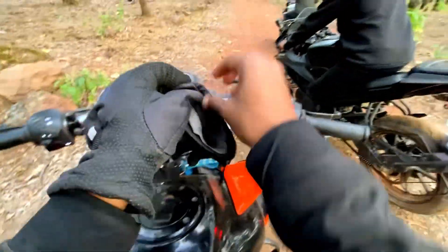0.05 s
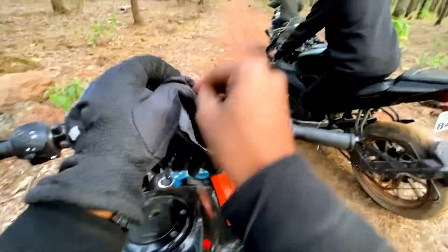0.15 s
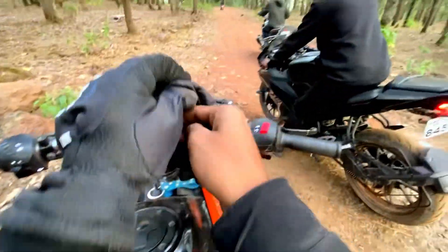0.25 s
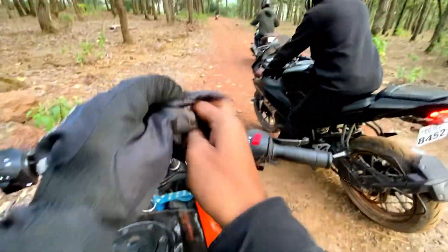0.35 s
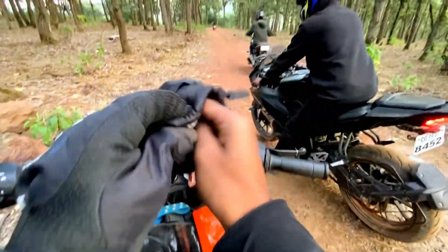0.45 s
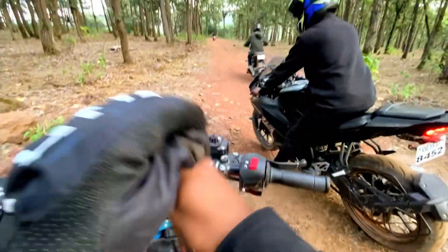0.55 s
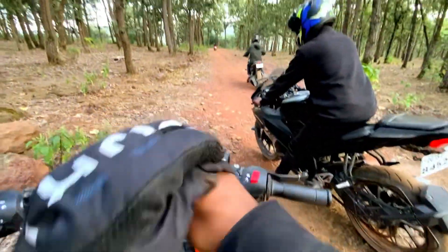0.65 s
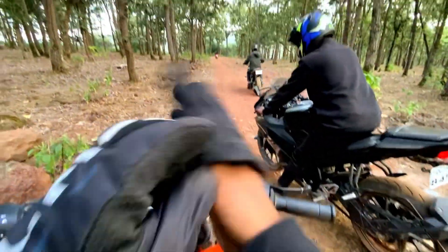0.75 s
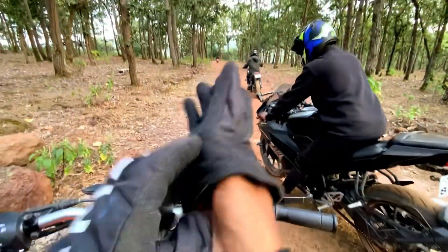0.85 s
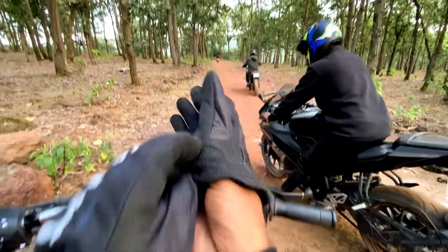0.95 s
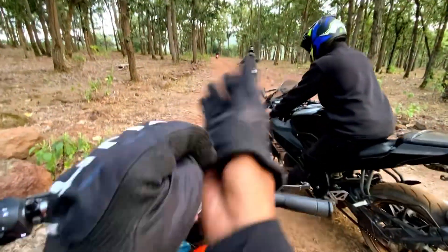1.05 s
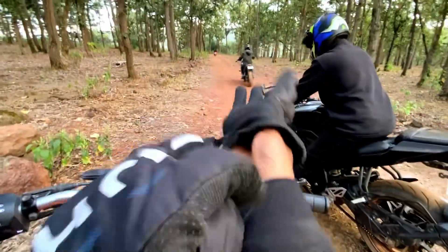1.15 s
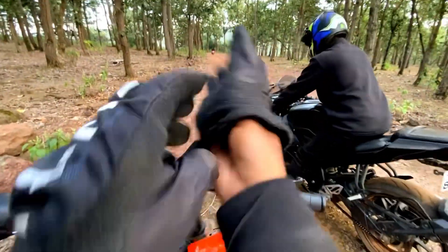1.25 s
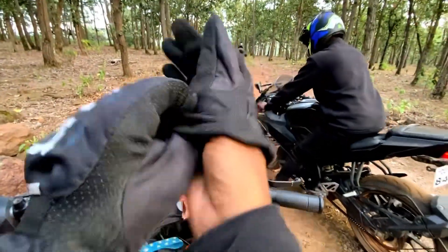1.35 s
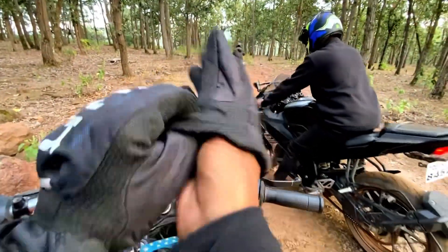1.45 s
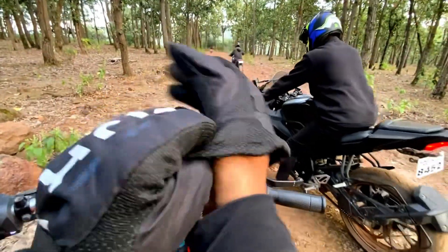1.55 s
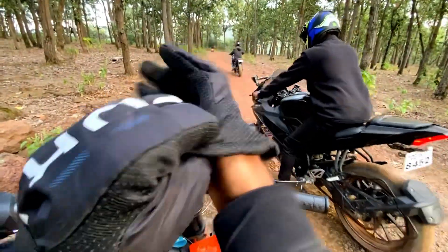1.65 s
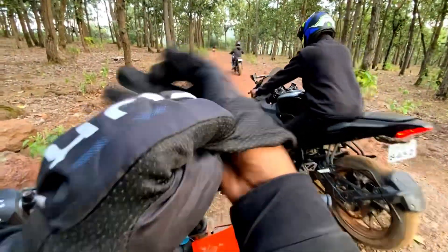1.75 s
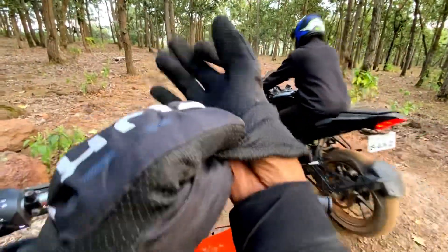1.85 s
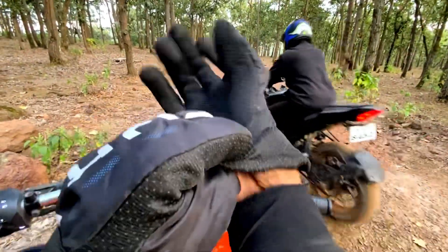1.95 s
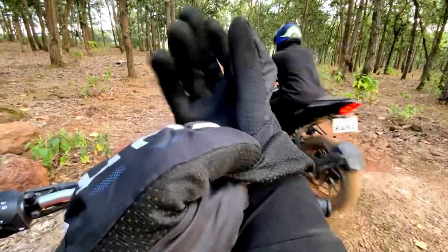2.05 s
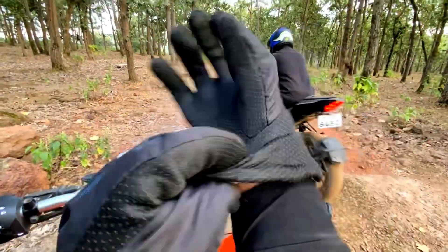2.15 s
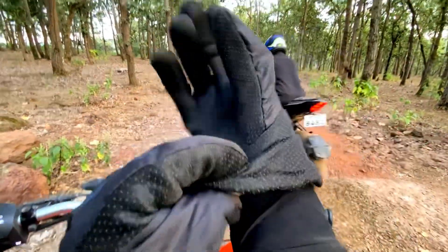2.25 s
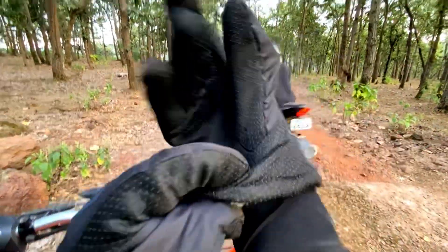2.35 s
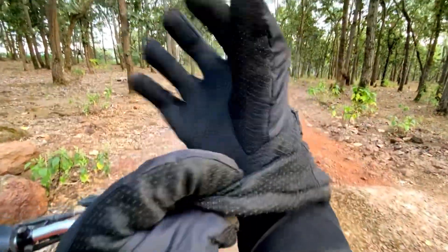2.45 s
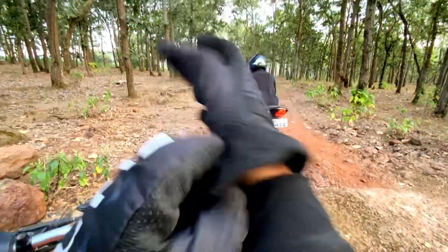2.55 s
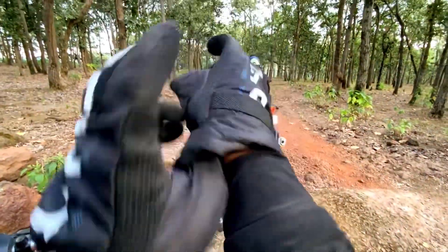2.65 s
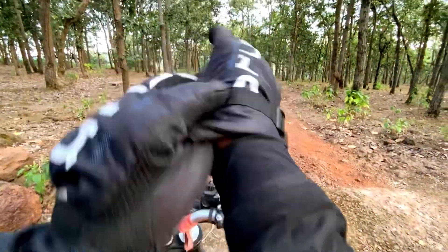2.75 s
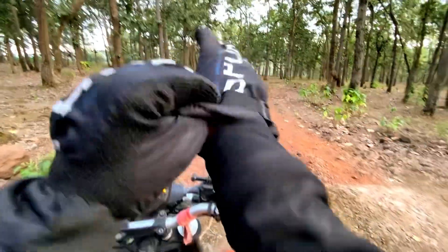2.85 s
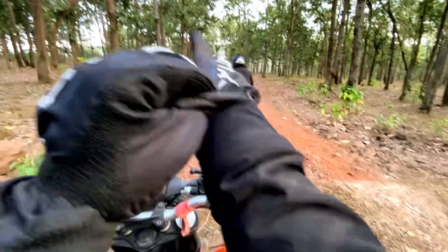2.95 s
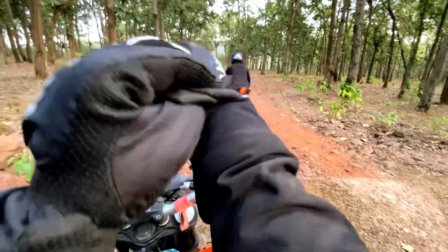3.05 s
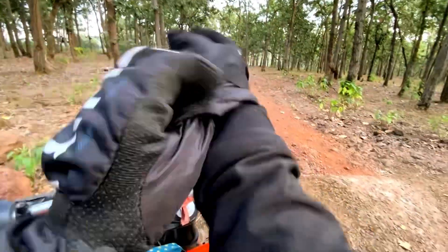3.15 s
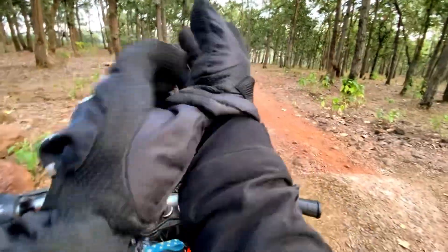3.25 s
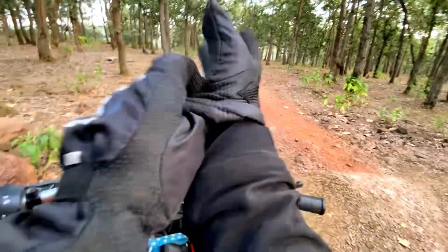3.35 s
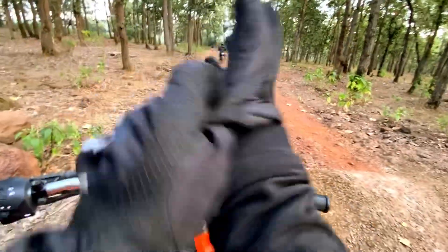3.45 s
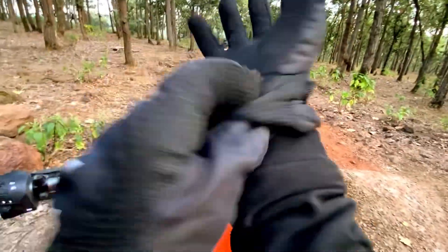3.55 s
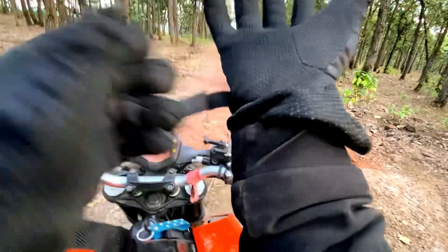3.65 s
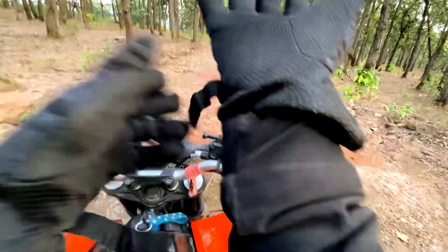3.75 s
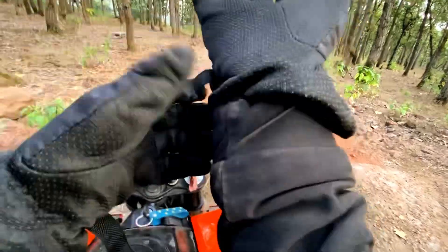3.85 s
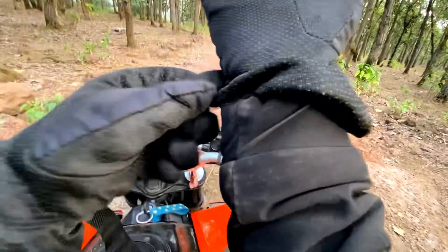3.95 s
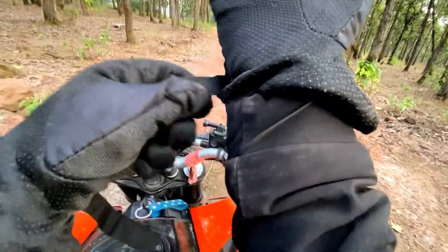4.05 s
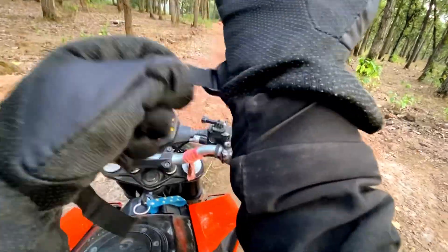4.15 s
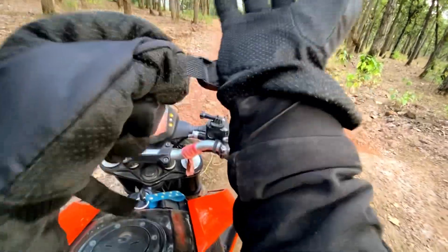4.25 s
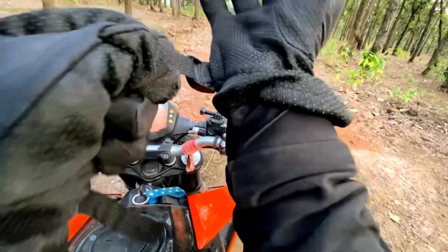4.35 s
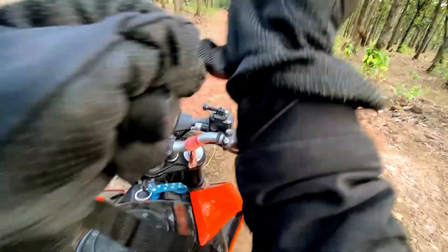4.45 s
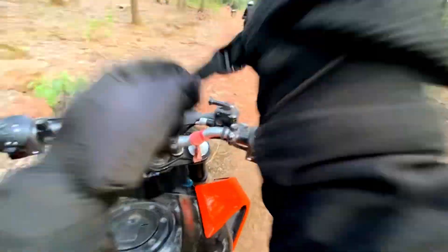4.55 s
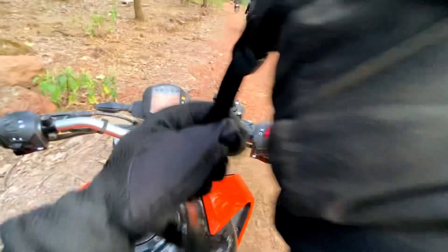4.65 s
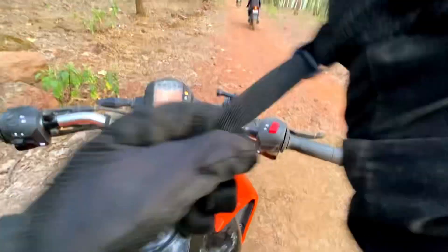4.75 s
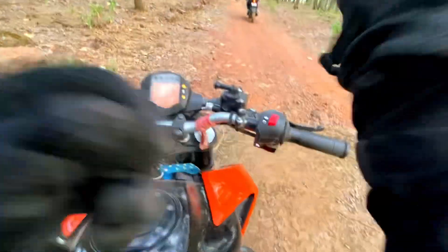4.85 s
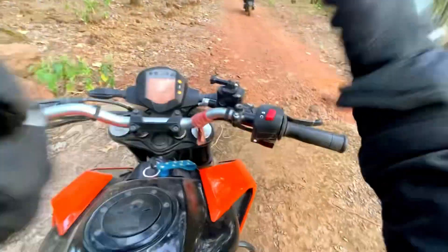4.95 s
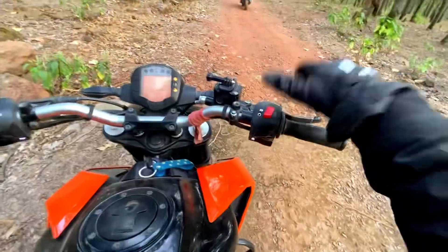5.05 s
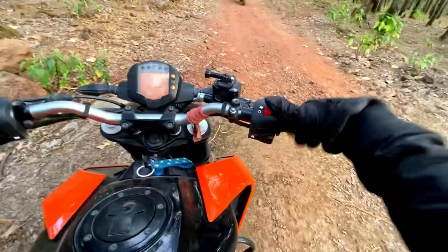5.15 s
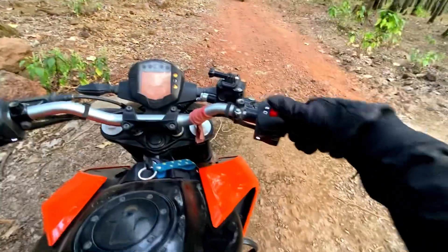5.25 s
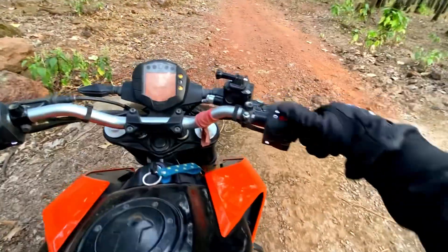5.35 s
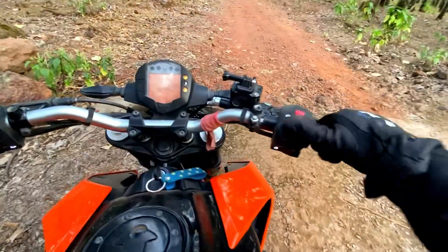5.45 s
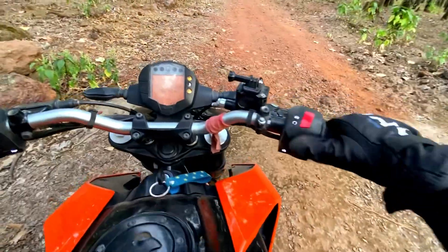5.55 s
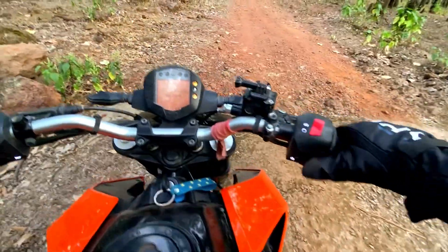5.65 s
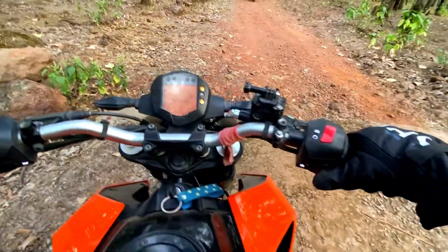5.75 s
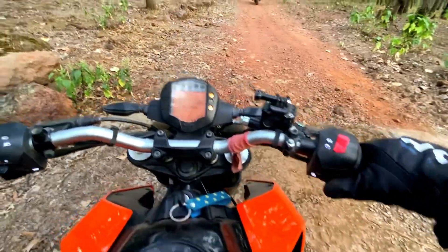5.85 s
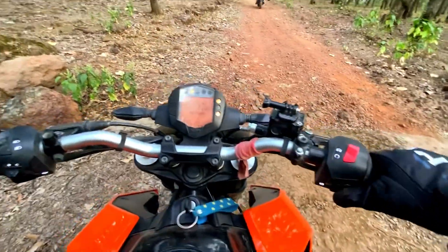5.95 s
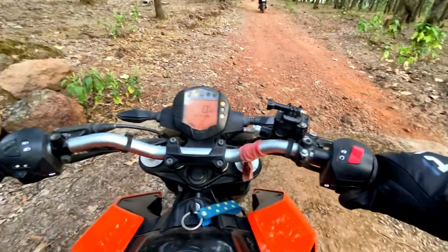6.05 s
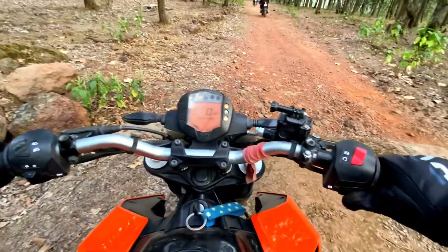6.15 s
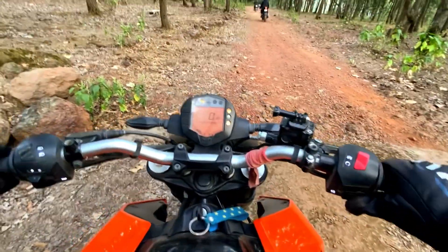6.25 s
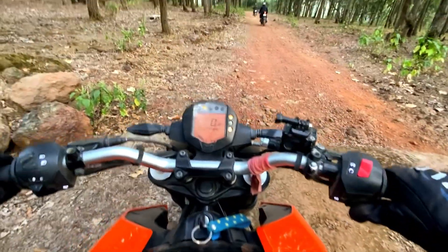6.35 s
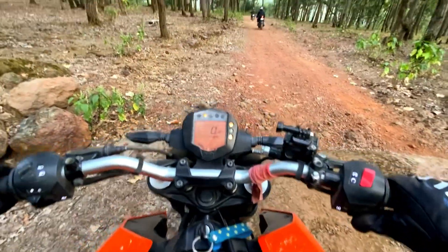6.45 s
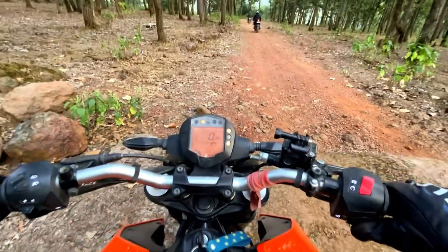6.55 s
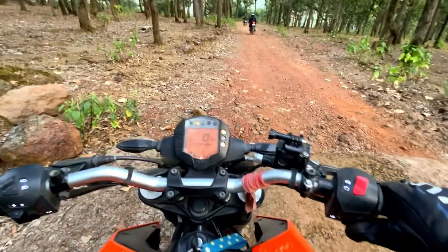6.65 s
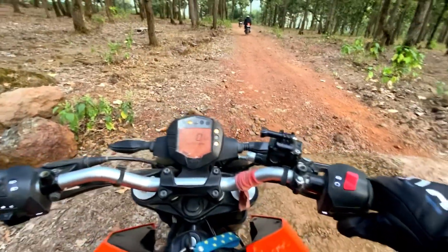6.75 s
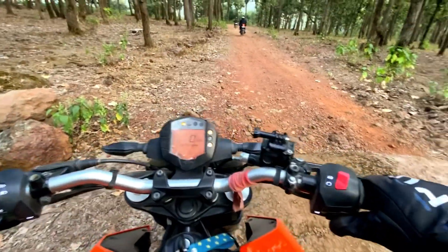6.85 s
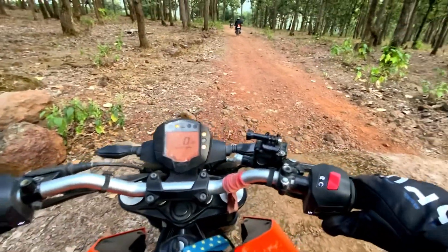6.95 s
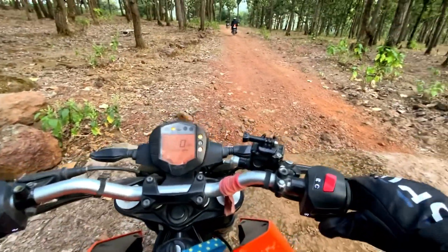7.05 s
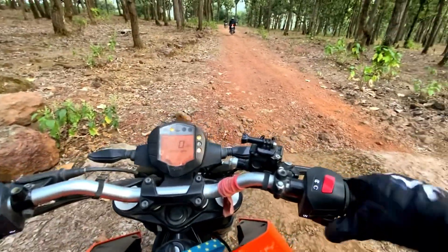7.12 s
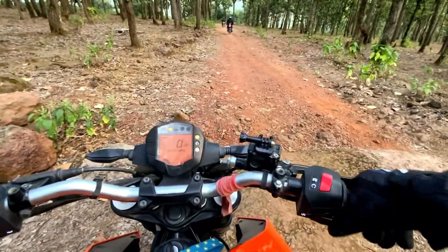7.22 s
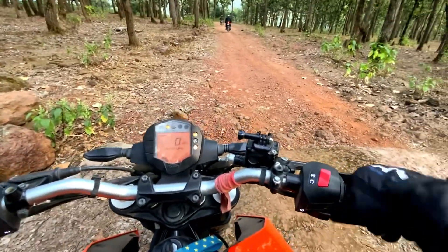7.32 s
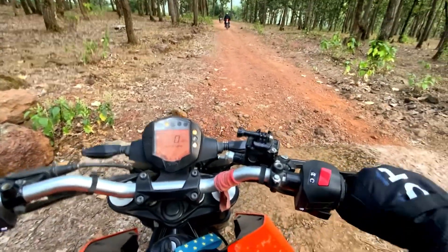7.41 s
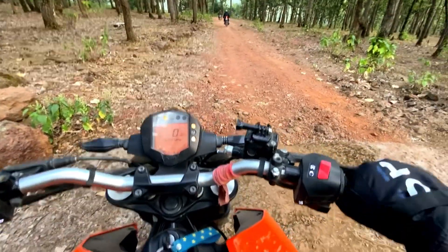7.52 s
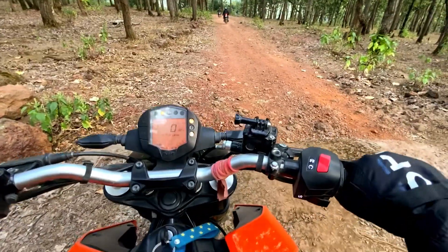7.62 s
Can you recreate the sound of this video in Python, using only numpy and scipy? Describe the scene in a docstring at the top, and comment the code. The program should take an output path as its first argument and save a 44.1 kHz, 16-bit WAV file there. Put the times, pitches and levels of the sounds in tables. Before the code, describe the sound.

Outdoors on a forest track, heard from a rider's helmet. A distant motorcycle pops away quickly while one alongside idles in slow thumps, blips up with a raspy roar, then recedes. Gloves snap and pat close by, wind rumbles in soft gusts, a switch clicks. Finally a starter clunks, whines and grinds, and the rider's engine catches and revs.

```python
"""A forest track, heard at a rider's helmet microphone among three single-cylinder motorcycles.
Far ahead one speeds off as sharp pops along its pipe; the one alongside revs up and rides away, its firings
puffing through pipe and silencer under noises gated by the cycle. Close by, gloves snap and a switch clicks
as ringing modes and noise. Then the rider's starter whines and grinds as it cranks, and the engine catches.
A light breeze, low noise swelling in gusts, rumbles on the microphone over a faint forest hiss."""
import sys
import numpy as np
from scipy import signal
from scipy.fft import rfft, irfft, next_fast_len
from scipy.io import wavfile
from scipy.ndimage import uniform_filter1d, map_coordinates

SR = 44100
rng = np.random.default_rng(int(sys.argv[2]) if len(sys.argv) > 2 else 0)


def dump(signal):
    """Clip the signal to [-1, 1] and save it as 16-bit WAV at the path in sys.argv[1]."""
    limited = np.clip(np.atleast_2d(signal).T, -1, 1)
    pcm = np.round(limited * 32767).astype(np.int16)
    wavfile.write(sys.argv[1], SR, pcm)


N = 338688
TIME = np.arange(N) / SR


def amp(db):
    """Decibels to gain."""
    return 10 ** (np.asarray(db) / 20)


def unit(x):
    """Scaled to rms 1."""
    return x / np.sqrt(np.mean(x ** 2) + 1e-20)


def curves(rows):
    """One value per sample for each column after the time."""
    s, *columns = np.transpose(rows)
    return [np.interp(TIME, s, column) for column in columns]


def ramp(s, length):
    """0 before s, 1 from length seconds later."""
    return np.clip((TIME - s) / length, 0, 1)


def bell(x):
    """A bell of height 1 and standard deviation 1 around zero."""
    return np.exp(-.5 * x ** 2)


def bump(s, width):
    """A bell in time, of height 1 around s."""
    return bell((TIME - s) / width)


def wobble(rate):
    """A smooth random curve, rate knots a second."""
    knots = rng.standard_normal(int(N * rate / SR) + 4)
    return map_coordinates(knots, [TIME * rate])


def filtered(x, response):
    """x times a complex response of frequency."""
    m = next_fast_len(N + SR // 2)
    return irfft(rfft(x, m) * response(np.fft.rfftfreq(m, 1 / SR)), m)[..., :N]


def noise(spectrum, flutter_db=1.5):
    """Coloured noise of rms 1 whose level flutters; only the shape of the spectrum counts."""
    f, db = np.transpose(spectrum)

    def colour(hz):
        return amp(np.interp(np.log(hz + 1), np.log(f + 1), db, -120, -120))

    return unit(filtered(rng.standard_normal(N) * amp(flutter_db * wobble(45)), colour))


def add(track, s, sound):
    """Mixes a sound in at s seconds."""
    part = track[round(s * SR):][:len(sound)]
    part += sound[:len(part)]


def strike(modes, t):
    """One blow on decaying modes, each a little stronger or weaker than usual."""
    ring = 0
    for hz, db, t60 in modes:
        ring = ring + amp(db + rng.normal(0, 1.7) - 60 * t / t60) * np.sin(2 * np.pi * hz * t)
    return ring * (1 - np.exp(-t / 0.00041))


def crank(speed, scatter_db):
    """One impulse per firing, sized for steady power at any speed, and the cycle count."""
    rate = curves(speed)[0]
    cycles = np.cumsum(rate * (TIME >= speed[0][0])) / SR
    fires = np.diff(np.where(cycles > 0, np.floor(cycles), -1), prepend=-1) > 0
    return fires * amp(scatter_db * wobble(40)) / np.sqrt(rate), cycles


def gate(cycles, depth, at):
    """Swells once a cycle around phase at; mean power 1."""
    return unit(np.exp(depth * np.cos(2 * np.pi * (cycles - at))))


def burst(cycles, at, fall_db):
    """Jumps up once a cycle at phase at and dies away by fall_db until the next; mean power 1."""
    return unit(uniform_filter1d(amp(-fall_db * ((cycles - at) % 1)), size=60))


def orders(cycles, table, waver_db=3.5, blur=0):
    """Tones locked to the crankshaft (gear teeth, cam lobes), a little unsteady."""
    total = 0
    for k, db in table:
        level = amp(db + waver_db * wobble(7.2)) * np.sqrt(2)
        phase = 2 * np.pi * k * cycles + 0.16 * wobble(9.8) + blur * wobble(30)
        total = total + level * np.sin(phase)
    return total


def pop(fires):
    """A short suck, then a sharp puff centred on each firing; peak about 1."""
    u = (TIME[:SR // 50] - .01) / .0007  # time in puff widths of 0.7 ms
    shape = bell(u) - .8 * bell((u + 2.8) / 1.4) - .3 * bell((u - 3) / 1.5)
    return signal.fftconvolve(fires, shape)[SR // 100:][:N]


# A small puff as the valve cracks open: (time before the suck [s], share of a full puff)
FORERUNNER_PUFF = (.0058, .2)


def exhaust(fires, echo, width, puff, pipe, box_hz, box_db, box_t60):
    """Each firing is a suck and a puff; the pipe returns them, then the silencer box breathes out slowly."""
    t = np.arange(SR // 8) / SR - .01

    def lobe(at, wide):
        return bell((t - at) / wide)

    late = np.maximum(t - pipe - width, 0)
    breath = amp(box_db - 60 * late / box_t60) * np.sin(2 * np.pi * box_hz * late)
    first = puff * lobe(2 * width, 0.64 * width) - 1.154 * lobe(0, 0.66 * width)
    first += breath - .65 * lobe(pipe, 0.71 * width)
    lead_s, share = FORERUNNER_PUFF
    first += share * lobe(-lead_s, .55 * width)
    back = lobe(pipe + 2 * width, width) - 0.32 * lobe(2 * pipe, 2.0 * width)
    back += 0.043 * lobe(2.5 * pipe, width)
    both = signal.fftconvolve(fires, first) + signal.fftconvolve(fires * echo, back)
    return 9.97 * both[SR // 100:][:N]


def resonances(x, modes, dull_hz):
    """x rings through modes of alternating sign; little above dull_hz leaves the pipe."""
    def response(f):
        ring = 0
        for k, (centre, width, db) in enumerate(modes):
            ring = ring + (-1) ** k * amp(db) * 1j * f * width / (centre ** 2 - f * f + 1j * f * width)
        return ring / (1 + 1j * f / dull_hz) ** 3

    return filtered(x, response)


# Header pipe of the two nearer bikes: (frequency [Hz], width [Hz], level [dB])
HEADER_MODES = [(284, 47, -0.5), (403, 57, -1)]
# Turbulent gas in the header: (frequency [Hz], relative density [dB])
RASP_SPECTRUM = [(60, -43.5), (180, -2), (270, -2.5), (400, -7.5), (520, -15), (900, -35.5)]


def rasp(fires, cycles, lead, rough):
    """The valve's opening rings the header pipe a moment before the puff; turbulent gas blurs the ring."""
    ring = unit(resonances(np.roll(fires, -round(lead * SR)), HEADER_MODES, dull_hz=870))
    gas = gate(cycles, depth=0.13, at=0.77) * noise(RASP_SPECTRUM)
    return np.sqrt(1 - rough) * ring + np.sqrt(rough) * gas


# Wind on the microphone: (frequency [Hz], relative density [dB])
BUFFET_SPECTRUM = [(5, -5), (12, -2.5), (25, -10), (50, -14), (120, -20.5), (220, -29), (350, -37),
                   (600, -80.5)]
# Hiss of the forest: (frequency [Hz], relative density [dB])
FOREST_SPECTRUM = [(300, -19.5), (500, -17.5), (750, -8.5), (1000, -23.5), (1500, -25), (2500, -24.5),
                   (3500, -31.5), (5000, -33.5), (8000, -37.5), (12000, -40), (15800, -45.5)]
# Gusts: (time [s], half length [s], gain [dB])
WIND_GUSTS = [(3.497, 0.15, 5.5), (4.627, 0.14, 6), (6.7, 0.11, 3.5)]


def air():
    """Lumpy wind on the microphone, easing off between gusts, over the faint hiss of the forest."""
    wind_db = -34.5 - 1.1 * TIME + 0.86 * wobble(4.2)  # eases by 1.1 dB a second
    wind_db += sum(db * bump(s, half) for s, half, db in WIND_GUSTS)
    return amp(wind_db) * noise(BUFFET_SPECTRUM) + amp(-70) * noise(FOREST_SPECTRUM, flutter_db=0.1)


# Engine of the bike far ahead: (time [s], firing rate [1/s])
LEADER_RATE = [(.024, 20.2), (.197, 21.4), (.417, 23.9), (.55, 24.4), (.71, 24.8), (.797, 26.3),
               (.927, 29.3), (1.05, 31), (1.6, 33)]
# Round trip of its pipe, shorter as the gas heats: (time [s], round trip [s])
LEADER_PIPE_TRIP = [(0.05, .0101), (.35, .0095), (.9, .0091)]
# Its tones: (multiple of the firing rate, relative level [dB])
LEADER_TONES = [(2, 0), (9, -3), (13, -17), (17, -21)]
# Fading as it draws away: (start time [s], added loss [dB/s])
LEADER_LOSS = [(.5, 9.2), (1.2, 55)]


def leader():
    """The bike far ahead: sharp pops that bounce along its pipe, over faint tones that swell and stop."""
    fires, cycles = crank(LEADER_RATE, scatter_db=.7)
    at = np.flatnonzero(fires)
    trip = curves(LEADER_PIPE_TRIP)[0][at] * SR
    halfway = .2 * np.clip(at / SR + .4, 0, 1)  # the halfway echo grows over the first 0.6 s
    bounces = np.zeros(N + SR)
    for half in range(9):
        share = .58 ** (half // 2) * (halfway if half % 2 else 1)
        arrival = at + np.round(half * trip / 2 + .003 * SR).astype(int)
        bounces[arrival] += share * fires[at]
    singing = .3 + .7 * ramp(.2, .25) - ramp(.82, .13)
    level_db = -36.5 - sum(loss_db * np.maximum(TIME - s, 0) for s, loss_db in LEADER_LOSS)
    return amp(level_db) * (unit(pop(bounces)) + singing * orders(cycles, LEADER_TONES))


# Engine of the bike alongside: (time [s], firing rate [1/s])
NEIGHBOUR_RATE = [(0.0624, 12.71), (0.45, 10.45), (0.63, 11.64), (1.33, 22.82), (1.69, 22.56),
                  (2.07, 16.27), (2.45, 17.14), (2.63, 18.97), (3.14, 20.26), (3.45, 19.91), (4.55, 22.85),
                  (4.8, 13.47), (5.03, 15.05), (5.24, 13.78), (5.8, 12.93), (6.05, 13.97), (6.38, 18.1),
                  (6.9, 15.7)]
# Louder on the throttle, falling with distance, faint as the throttle shuts: (time [s], exhaust drive [dB])
NEIGHBOUR_DRIVE = [(0.06, -32.5), (0.4, -32.5), (1.15, -24.5), (1.65, -24.5), (2.0, -28), (2.56, -28),
                   (3.0, -30), (4.46, -36), (4.69, -47.5), (4.95, -48), (5.3, -43), (6.38, -46),
                   (7.68, -53)]
# Its tones: (multiple of the firing rate, level against the rasp [dB])
NEIGHBOUR_TONES = [(2, 10), (10, -8), (15, -15), (17, -15), (18, -12), (46, -21)]
# Gear whine rising with the hiss: (multiple of the firing rate, level against the hiss [dB])
GEAR_TONES = [(48, -5)]
# Engine clatter, also the rider's own intake roar: (frequency [Hz], relative density [dB])
CLATTER_SPECTRUM = [(400, -36), (560, -12.5), (660, -6.5), (800, -2), (950, -5.5), (1200, -18), (2000, -38)]
# Engine ticking: (frequency [Hz], relative density [dB])
TICKING_SPECTRUM = [(900, -34), (1300, -5.5), (1560, -5), (1780, -4), (2300, -9.5), (2750, -14.5),
                    (3700, -21.5), (4850, -29.5), (5600, -31.5), (7000, -39), (11000, -55.5)]
# Engine hiss near 1 kHz: (frequency [Hz], relative density [dB])
HISS_SPECTRUM = [(700, -35), (950, -3.5), (1100, -2), (1250, -3), (1500, -17.5), (1750, -13.5), (1950, -16),
                 (2300, -25), (3000, -34)]
# The hiss is lifted by the ground reflection, then sinks:
# (rise time [s], rise length [s], sink time [s], sink length [s], hiss gain [dB])
HISS_LIFT = (1.9, 0.87, 4.27, 1.3, 7.24)
BLIP_S = 1.476  # the throttle is blipped


def riding_off(standing_db, blip_db, loss_db):
    """Gain of a noise that swells with the blip and fades, loss_db a second, as the bike leaves."""
    return amp(standing_db + blip_db * bump(BLIP_S, 0.38) - loss_db * np.maximum(TIME - 2.15, 0))


def neighbour():
    """The bike alongside: exhaust beats, rasp, clatter, hiss and ticks, all timed by its strokes."""
    # the share of the pipe echo grows with each firing a second above 19
    echo = np.clip(.36 + .2 * np.maximum(curves(NEIGHBOUR_RATE)[0] - 19, 0), 0, 1)
    fires, cycles = crank(NEIGHBOUR_RATE, scatter_db=.5)
    strokes = fires * amp(curves(NEIGHBOUR_DRIVE)[0])
    beats = exhaust(strokes, echo, width=0.0019, puff=1.165, pipe=0.00823,
                    box_hz=34.3, box_db=-9.5, box_t60=0.21)
    revving = bump(BLIP_S, 0.24)  # the gears sing at the top of the blip
    header = rasp(fires, cycles, lead=.009, rough=.85 - .3 * revving)
    header += revving * orders(cycles, NEIGHBOUR_TONES)
    clatter = gate(cycles, depth=0.17, at=.9) * noise(CLATTER_SPECTRUM)
    rise_s, rise_length, sink_s, sink_length, lift_db = HISS_LIFT
    lifted = ramp(rise_s, rise_length)
    hiss = gate(cycles, depth=0.075, at=0.93) * noise(HISS_SPECTRUM)
    hiss += lifted * orders(cycles, GEAR_TONES, blur=2.5)
    hiss *= amp(lift_db * (lifted - 2 * ramp(sink_s, sink_length)))  # ends as far below as it rose
    ticks = burst(cycles, at=.77, fall_db=8) * noise(TICKING_SPECTRUM, flutter_db=1.2)
    ticks *= amp(2.2 * wobble(300))
    out = beats + riding_off(standing_db=-49, blip_db=5.5, loss_db=3.1) * header
    out += riding_off(standing_db=-59, blip_db=5, loss_db=1.5) * clatter
    out += riding_off(standing_db=-65.5, blip_db=7.4, loss_db=1.5) * hiss
    out += riding_off(standing_db=-64.5, blip_db=9.3, loss_db=5) * ticks
    return out


# Glove snaps and pats: (time [s], level [dB], knock [Hz], pat over snap [dB], crispness [dB])
GLOVE_TOUCHES = [(0.497, -43, 1060, -8, -15), (1.476, -41.5, 1110, -6, -11), (1.734, -31.5, 795, 9, -28),
                 (2.39, -40, 950, 11, -8), (2.783, -41.5, 1040, -25, -8.5), (3.777, -25, 1200, 4, -20),
                 (3.852, -43, 1400, -5, -21), (4.482, -43.5, 900, 12, -23), (4.61, -49, 700, 19, -8),
                 (4.855, -43.5, 1020, -5, -30), (5.119, -48.5, 1360, -16, -11), (5.283, -55, 900, -12, -30)]
# Handlebar switch: (time [s], level [dB], crispness [dB])
SWITCH_CLICKS = [(5.172, -54.5, -2), (5.424, -42.5, -1)]
# Its resonances: (frequency [Hz], level [dB], t60 [s])
SWITCH_RING = [(860, -3, .03), (1800, 0, .016), (2250, -1, .016), (2900, -3, .012), (3900, -8, .01),
               (4500, -10, .01)]
# Small metal ticks from the bike pulling away: (time [s], level [dB])
METAL_TICKS = [(1.859, -56), (1.891, -51), (1.905, -55), (1.946, -63.5)]
# Their resonances: (frequency [Hz], level [dB], t60 [s])
METAL_RING = [(1920, 7, 0.021), (2600, 1, .01), (4000, -2.5, 0.008), (5440, -2, 0.01), (7600, -12, .005)]
# Glove cloth rubbing: (time [s], half length [s], level [dB])
CLOTH_RUSTLES = [(1.89, .03, -69.5), (3.463, .03, -74.5), (4.61, 0.027, -73), (4.79, 0.067, -76)]
# A brake or lever squeaks: (time [s], length [s], frequency [Hz], level [dB])
LEVER_SQUEAK = (1.892, .04, 2420, -50)
# Glove cloth, also part of the starter's grind: (frequency [Hz], relative density [dB])
CLOTH_SPECTRUM = [(500, -15.5), (800, 12.5), (1200, 1.5), (1800, -12.5), (2600, -28.5), (4000, -55)]
# Palm pat, also the starter's crankcase drone: (frequency [Hz], relative density [dB])
PALM_SPECTRUM = [(120, -25.5), (300, 10.5), (550, -9), (900, -26), (1500, -49.5)]
# Crisp edge of cloth and switch: (frequency [Hz], relative density [dB])
CRISP_SPECTRUM = [(1500, -14.5), (2500, 4), (5000, -14.5), (8000, -19), (11000, -42)]


def handling():
    """Gloves snap and pat, a switch clicks, metal ticks and something squeaks."""
    out, t = np.zeros(N), TIME[:SR // 10]
    cloth, palm, crisp = noise(CLOTH_SPECTRUM), noise(PALM_SPECTRUM), noise(CRISP_SPECTRUM)

    def soft(rise, t60):
        return amp(-60 * t / t60) * np.sin(np.pi / 2 * np.clip(t / rise, 0, 1)) ** 2

    def tone(hz):
        return np.sin(2 * np.pi * hz * t)

    for s, db, knock_hz, pat_db, crisp_db in GLOVE_TOUCHES:
        i = round(s * SR)
        snap = cloth[i:][:len(t)] + amp(crisp_db) * crisp[i:][:len(t)]
        knock = tone(knock_hz) + .5 * tone(.75 * knock_hz) + .12 * tone(1.85 * knock_hz)
        knock = soft(.001, .013) * (knock - amp(pat_db) * tone(320))  # with the palm's thud
        tail = soft(.001, .05) * snap + amp(pat_db) * soft(.002, .05) * palm[i:][:len(t)]
        add(out, s - .0005, amp(db) * (knock + amp(-12) * tail))
    for s, db, crisp_db in SWITCH_CLICKS:
        edge = amp(crisp_db) * soft(0.00045, 0.013) * crisp[round(s * SR):][:len(t)]
        add(out, s, amp(db) * (strike(SWITCH_RING, t) + edge))
    for s, db in METAL_TICKS:
        add(out, s, amp(db) * strike(METAL_RING, t))
    rubbing = sum(amp(db) * bump(s, half) for s, half, db in CLOTH_RUSTLES)
    out += rubbing * amp(2.7 * wobble(200)) * crisp
    s, length, hz, db = LEVER_SQUEAK
    t = TIME[:round(length * SR)]
    squeak = np.sin(2 * np.pi * hz * t + 2.0 * wobble(180)[:len(t)])
    add(out, s, amp(db) * np.sin(np.pi * np.sqrt(t / length)) * squeak)
    return out


# Relay clunk: (time [s], frequency [Hz], level [dB], t60 [s])
RELAY_CLUNK = (6.39, 430, -29, .035)
# The case booms as the gears take and drop load: (time [s], frequency [Hz], level [dB], t60 [s])
CASE_BOOMS = [(6.558, 390, -37, .07), (6.626, 400, -38, .04), (6.872, 290, -31, .07)]
# Gear teeth sing in short glides while spinning up and on each compression:
# (start time [s], length [s], first pitch [Hz], last pitch [Hz], whine level [dB], grind level [dB])
TOOTH_WHINES = [(6.419, 0.055, 1320, 1186, -46, -59), (6.422, 0.031, 1835, 2070, -45.5, -64),
                (6.476, 0.059, 3840, 4720, -65, -51), (6.484, 0.018, 7040, 7350, -69, -75),
                (6.498, 0.016, 5150, 5340, -68, -73), (6.514, 0.039, 1810, 1280, -42.5, -55),
                (6.519, 0.037, 2590, 2480, -44, -65), (6.556, 0.016, 3870, 4020, -58, -58),
                (6.695, 0.046, 2250, 1734, -35.5, -43), (6.697, .018, 1800, 1750, -43, -55),
                (6.718, .016, 2600, 2500, -45, -60), (6.724, 0.018, 883, 800, -44, -59),
                (6.858, 0.019, 2120, 1930, -39.5, -42)]
# The pinion is kicked out of the ring gear and rebounds: (time [s], level [dB])
PINION_CLACKS = [(6.855, -34), (6.8575, -33), (6.864, -33), (6.869, -38)]
# Its resonances: (frequency [Hz], level [dB], t60 [s])
PINION_RING = [(560, -6, .03), (947, 0, .03), (1206, 0, .03), (1650, -5, .02), (2067, -1, .04),
               (2476, -2, .022), (2923, -13, .02), (4414, -15, .015)]
# The rider's engine case, for gear mesh and engine clatter: (frequency [Hz], relative density [dB])
CASING_SPECTRUM = [(350, -9), (500, -12), (630, -19), (790, -18.5), (916, -14), (1050, -24), (1180, -9),
                   (1560, -20.5), (1780, -13), (2180, -13.5), (2600, -15.5), (2900, -26.5), (3280, -25.5),
                   (3800, -31), (5000, -40), (6000, -47.5), (6720, -46.5), (8000, -57.5), (11000, -66.5)]
# Pinion sheen: (frequency [Hz], relative density [dB])
SHEEN_SPECTRUM = [(2500, -42), (3300, 3.5), (4500, -1), (7000, -11), (9500, -18.5), (11000, -39)]
# The sheen thins as the teeth load up: (time [s], half length [s], depth [dB])
SHEEN_THINNING = (6.54, 0.014, 8)
ENGAGE_S, BITE_S, RELEASE_S = 6.39, 6.555, 6.9  # the pinion meets the ring gear, takes the load, lets go


def starter():
    """A relay clunks, the gears spin up and bite; the motor whines in short glides, some rising, some falling."""
    held = 1 - ramp(RELEASE_S, 0.058)
    free = 1 - ramp(BITE_S - .012, .012)
    mesh_db = -50 + 9.5 * free * ramp(ENGAGE_S, BITE_S - ENGAGE_S)  # rises while spinning up
    teeth = amp(2.2 * wobble(330) + .8 * wobble(60))  # grainy, uneven engagement
    attack = 0.36 * ramp(ENGAGE_S, 0.0016) + 0.61 * ramp(ENGAGE_S, 0.022)
    mesh = attack * amp(mesh_db) * noise(CASING_SPECTRUM) * teeth
    dip_s, dip_half_s, dip_db = SHEEN_THINNING
    sheen_db = -60.5 - dip_db * bump(dip_s, dip_half_s)
    sheen_db -= (1 - free) * (16 + 34 * (TIME - BITE_S))  # drops 16 dB at the bite, then 34 dB a second
    sheen = ramp(6.43, .07) * amp(sheen_db) * noise(SHEEN_SPECTRUM, flutter_db=2.0)
    drone = ramp(ENGAGE_S, 0.039) * amp(-53) * noise(PALM_SPECTRUM)
    out = held * (mesh + sheen + drone)
    grind = noise(CASING_SPECTRUM) + 0.19 * noise(SHEEN_SPECTRUM) + 0.35 * noise(CLOTH_SPECTRUM)
    for s, length, first_hz, last_hz, whine_db, grind_db in TOOTH_WHINES:
        u = np.arange(round(length * SR)) / (length * SR)
        jitter = wobble(478)  # uneven teeth
        shape = np.clip(60 * u, 0, 1) * np.clip(7 * (1 - u), 0, 1)
        pitch_hz = first_hz + (last_hz - first_hz) * u ** 1.7
        whine = np.sin(2 * np.pi * np.cumsum(pitch_hz) / SR + .6 * jitter[:len(u)])
        whine *= (.5 + u) * amp(3 * jitter[-len(u):])
        grinding = grind[round(s * SR):][:len(u)]
        add(out, s, shape * (amp(whine_db) * whine + amp(grind_db) * grinding))
    t = TIME[:SR // 20]
    for s, hz, db, t60 in [RELAY_CLUNK, *CASE_BOOMS]:
        add(out, s, amp(db - 60 * t / t60) * np.sin(2 * np.pi * hz * t) * (1 - np.exp(-t / .003)))
    for s, db in PINION_CLACKS:
        add(out, s, amp(db) * strike(PINION_RING, t))
    return out


# The rider's own engine: (time [s], firing rate [1/s])
OWN_RATE = [(6.8961, 9.09), (6.98, 14.74), (7.09, 20.83), (7.23, 21.39), (7.43, 19.34), (7.49, 20.12),
            (7.68, 29.78)]
# Its loudness: (time [s], exhaust drive [dB], rasp drive [dB])
OWN_DRIVE = [(6.89, -27.5, -59.5), (7.0, -26.5, -42), (7.1, -26.5, -44), (7.25, -29, -42), (7.42, -31, -44),
             (7.5, -26, -40), (7.68, -23.5, -39)]
# Unfired strokes breathing through the exhaust while cranking: (time [s], exhaust drive [dB])
UNFIRED_PUFFS = [(6.583, -52), (6.763, -51)]
# Small pops as the valves open and shut: (time after the firing [s], level against the rasp drive [dB])
VALVE_SNAPS = [(.0027, 10), (.0105, 8), (.0225, 12)]
# Its tones: (multiple of the firing rate, level against the rasp drive [dB])
OWN_TONES = [(4, 4), (13, -13), (16, -11), (21, -14)]
THROTTLE_S = 7.45  # the throttle opens


def own_engine():
    """Breathes unfired while cranked, catches and settles, then the throttle opens and the intake roars."""
    level_db, rasp_db = curves(OWN_DRIVE)
    fires, cycles = crank(OWN_RATE, scatter_db=.4)
    strokes = fires * amp(level_db)
    for s, db in UNFIRED_PUFFS:
        strokes[round(s * SR)] = amp(db)
    echo = 0.34 + 0.2 * ramp(THROTTLE_S + 0.072, 0.07)  # more pipe echo on the throttle
    beats = exhaust(strokes, echo, width=0.0018, puff=0.54, pipe=0.0073,
                    box_hz=26.0, box_db=-2.5, box_t60=0.13)
    valves = sum(amp(db + 2 * wobble(25)) * np.roll(fires > 0, round(s * SR)) for s, db in VALVE_SNAPS)
    # the tones sing once it runs evenly, until the throttle opens
    settling = ramp(7.05, .1) - .7 * ramp(7.42, .08)
    header = .6 * rasp(fires, cycles, lead=.002, rough=.97) + pop(valves)
    header = amp(rasp_db) * (header + settling * orders(cycles, OWN_TONES))
    clatter = amp(-49) * gate(2 * cycles, depth=0.17, at=0.25) * noise(CASING_SPECTRUM, flutter_db=1.65)
    intake = amp(-50) * ramp(THROTTLE_S, 0.28) * gate(cycles, depth=0.21, at=0.31) * noise(CLATTER_SPECTRUM)
    return beats + (header + clatter + intake) * ramp(OWN_RATE[0][0], 0.0091)


def scene():
    """Everything reaches one microphone."""
    return (air() + leader() + neighbour() + handling() + starter() + own_engine())[None]


def record(dry):
    """The microphone passes no steady pressure (8 Hz corner) and nothing above 15740 Hz."""
    return filtered(dry, lambda hz: 1j * hz / (8 + 1j * hz) * (hz < 15740))


dry = scene()
out = record(dry)
dump(out)
```